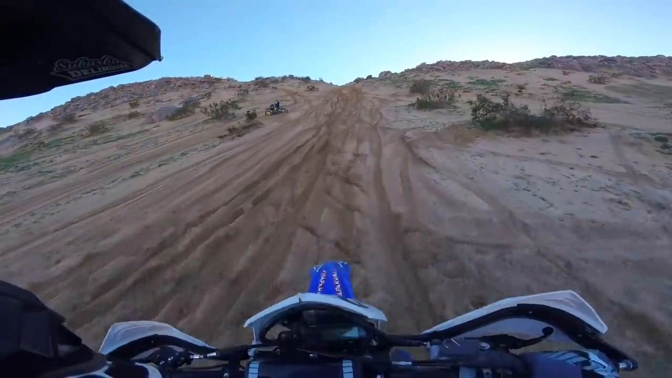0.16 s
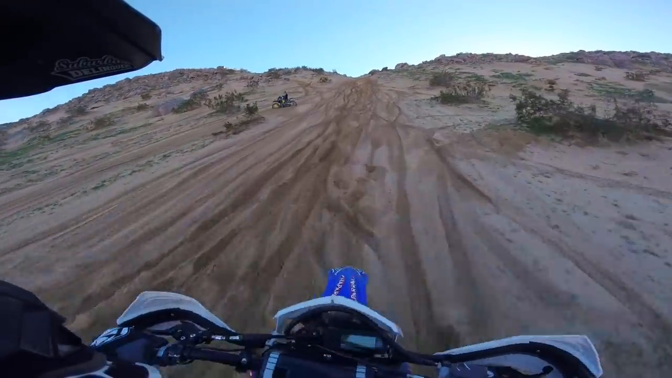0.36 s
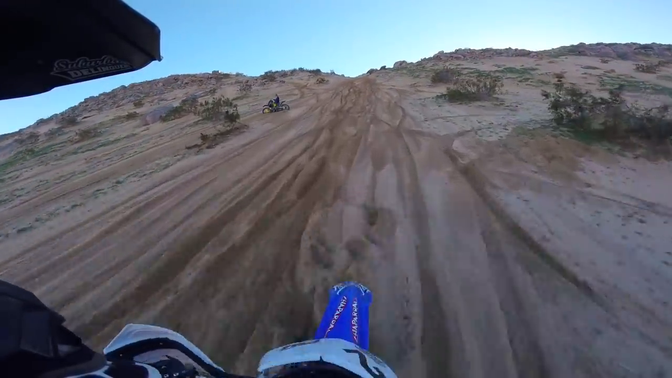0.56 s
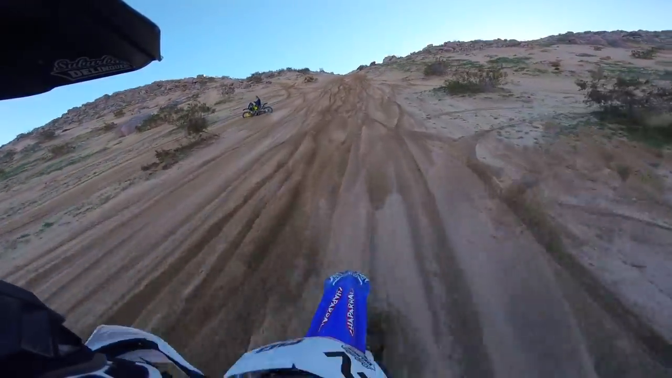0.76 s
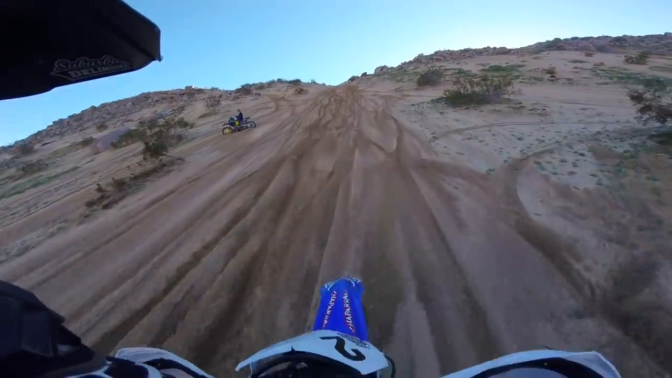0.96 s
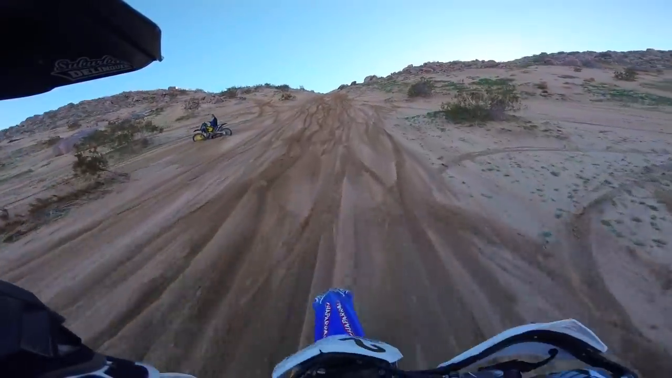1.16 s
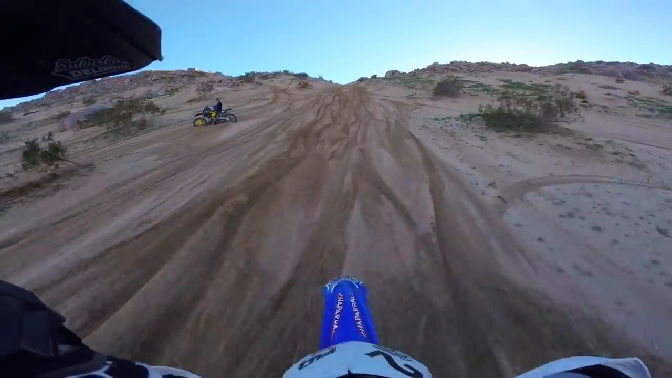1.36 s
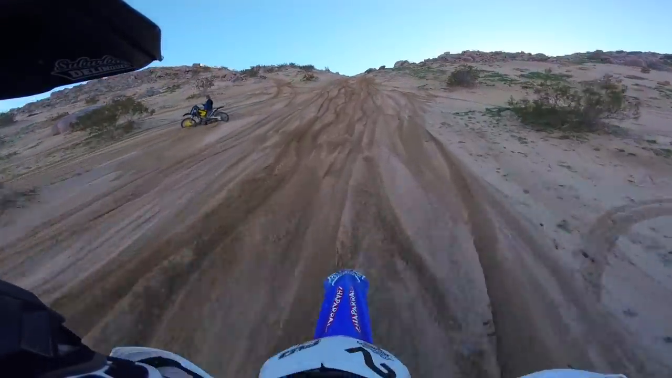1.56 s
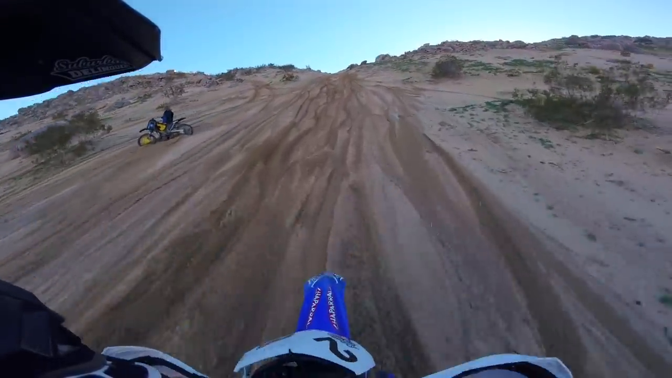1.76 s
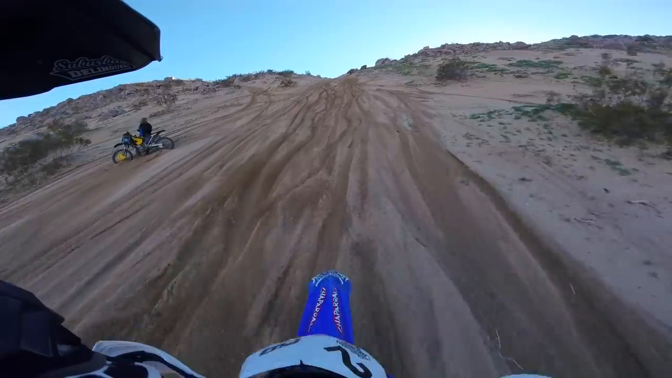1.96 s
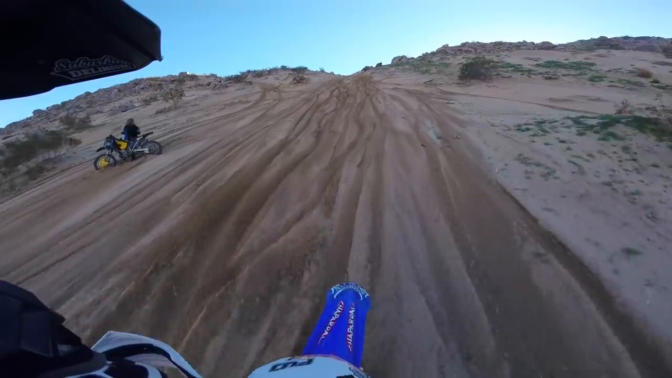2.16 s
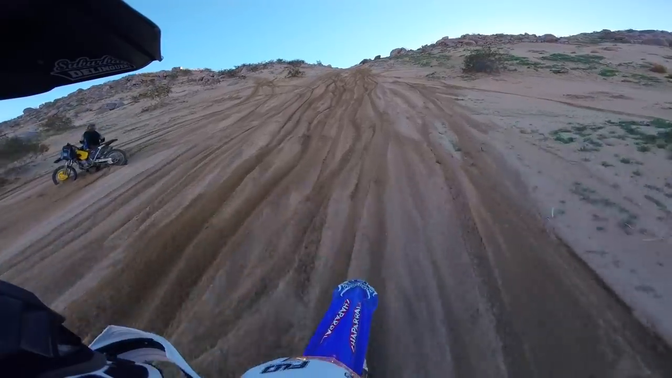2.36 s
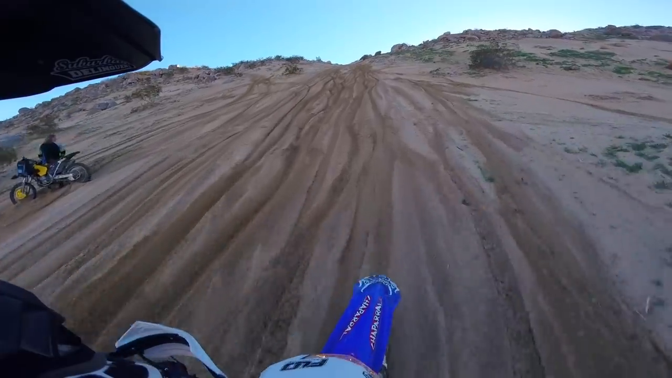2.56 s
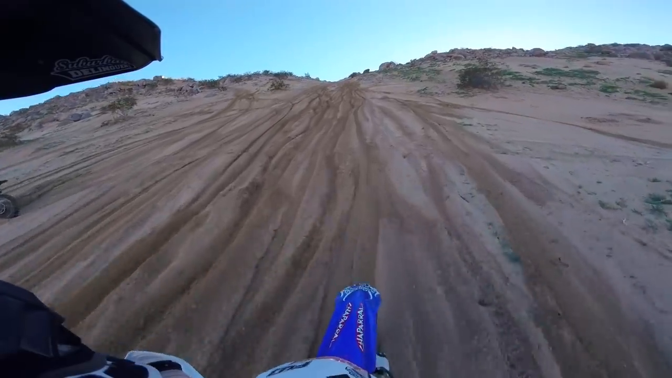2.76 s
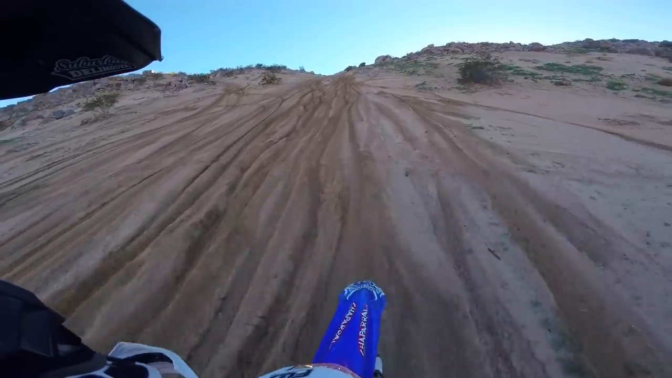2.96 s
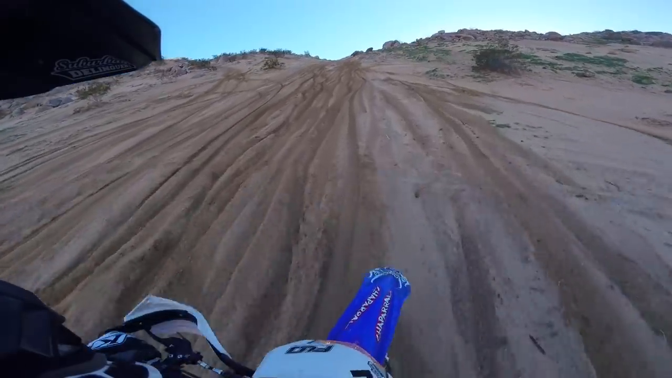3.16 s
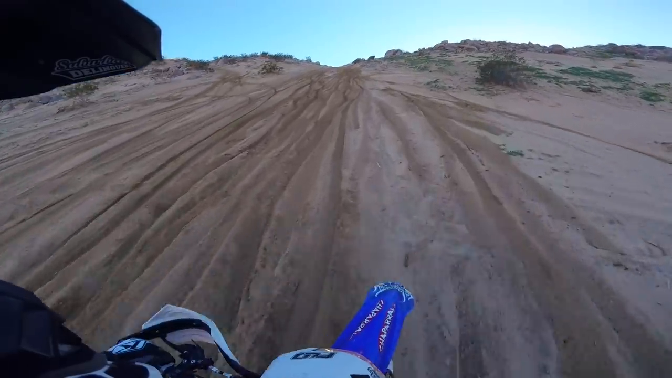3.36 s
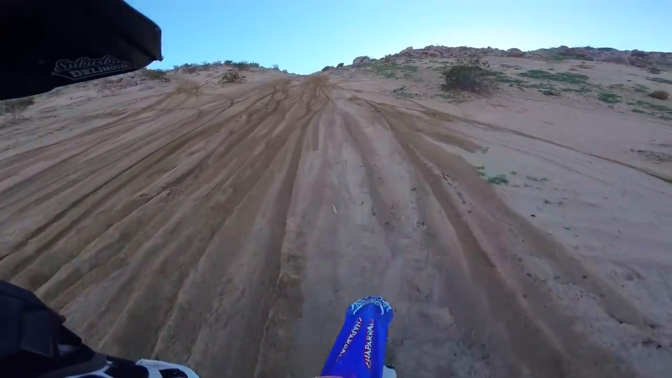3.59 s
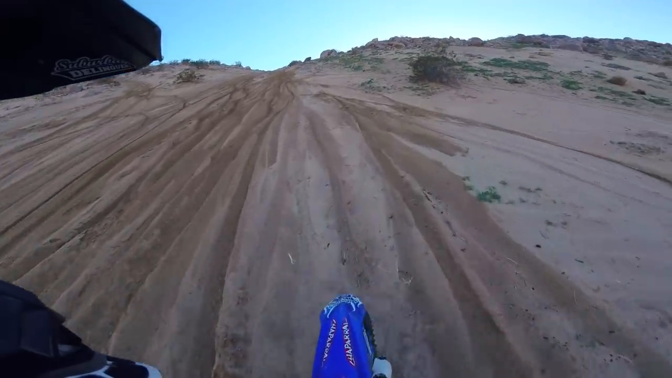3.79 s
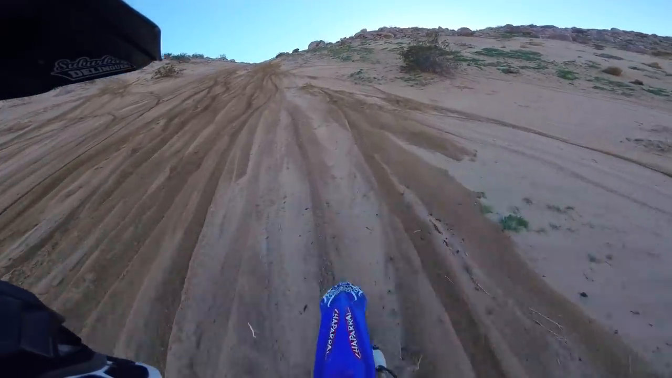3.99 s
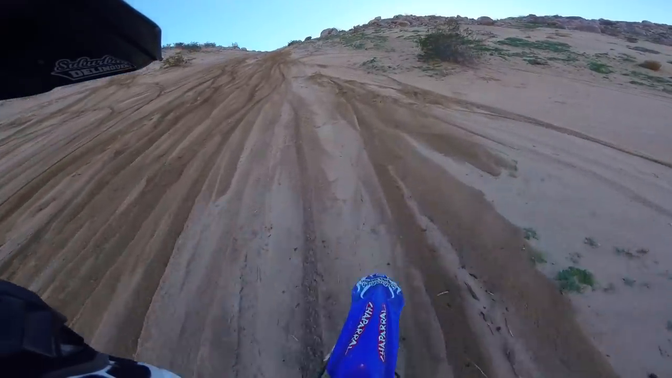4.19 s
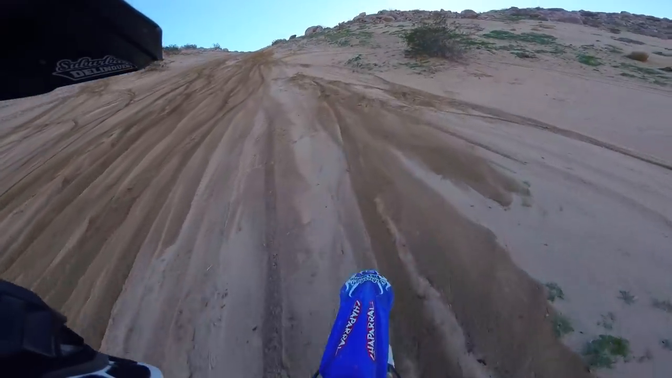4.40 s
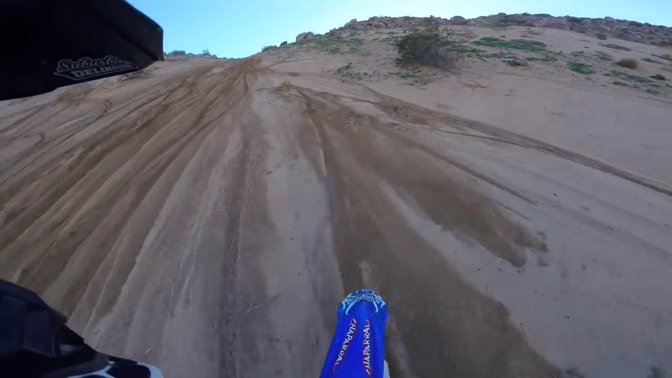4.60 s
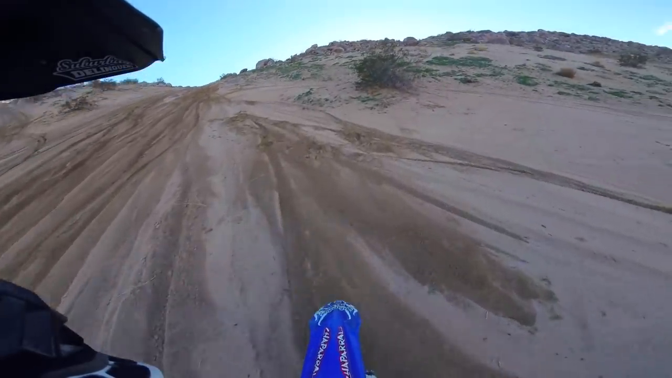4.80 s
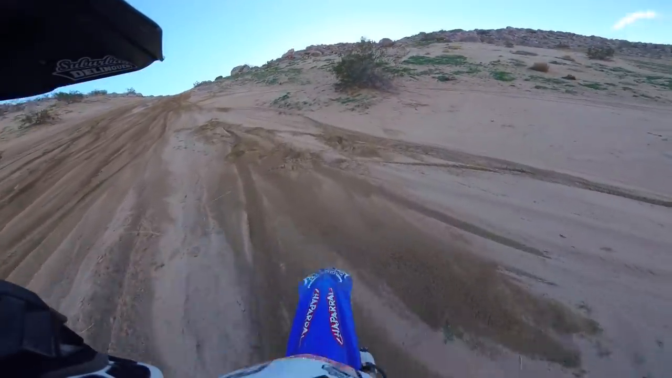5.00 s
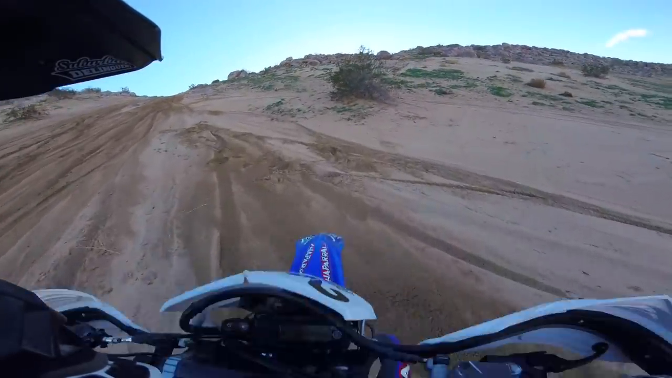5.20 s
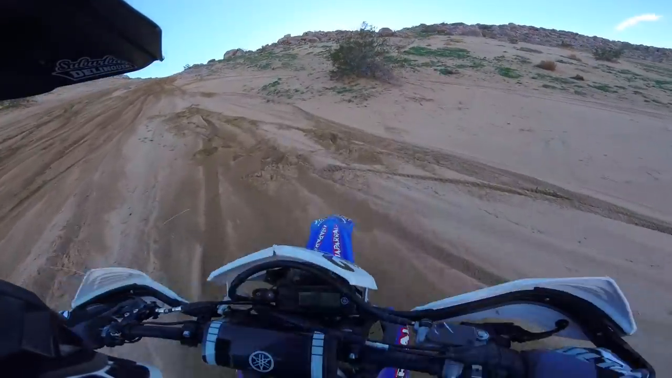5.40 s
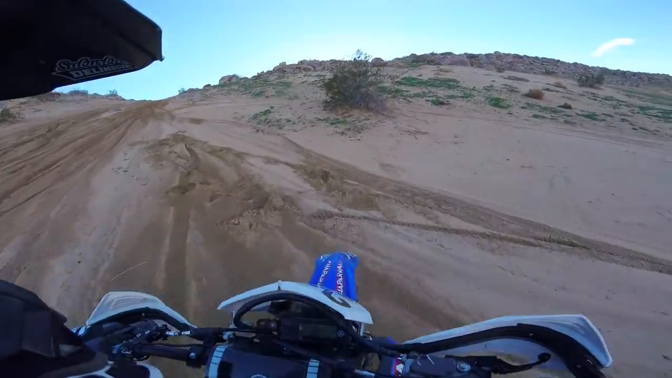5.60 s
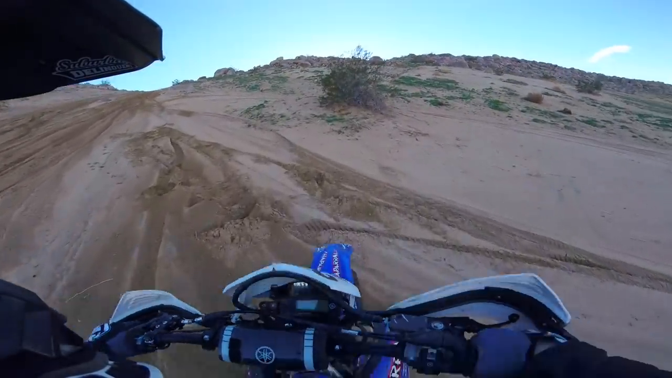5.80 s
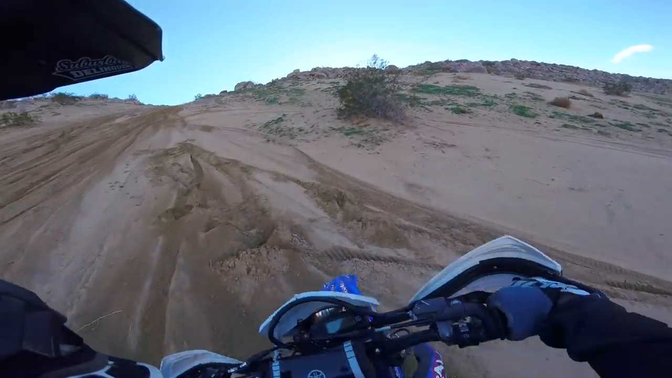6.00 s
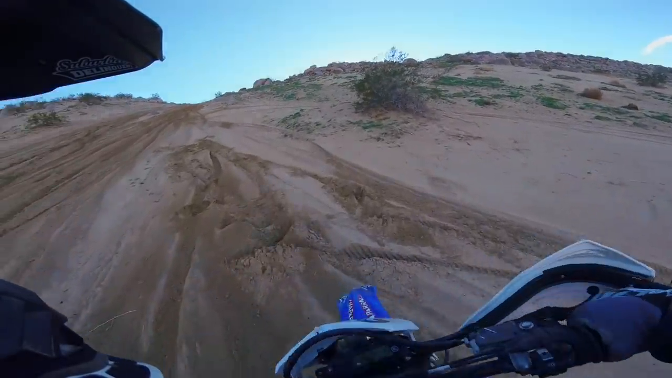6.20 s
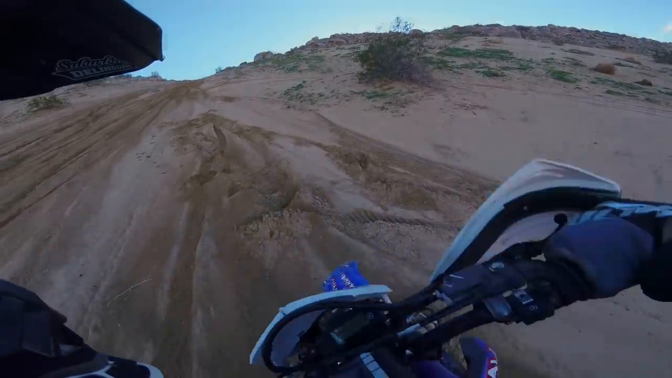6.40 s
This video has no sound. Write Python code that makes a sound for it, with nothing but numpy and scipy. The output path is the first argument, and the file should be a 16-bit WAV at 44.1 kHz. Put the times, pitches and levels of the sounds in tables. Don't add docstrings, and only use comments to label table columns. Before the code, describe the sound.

From the rider's helmet, a single-cylinder four-stroke dirt bike blares at full throttle up a sand hill. Revs rise briefly, settle into a rough steady drone with valve clatter and intake boom, then sag and drop as the throttle closes, leaving low soft puffs and small fading pops. Low wind buffeting and faint sand spray outdoors.

```python
import sys
import numpy as np
from scipy import signal
from scipy.io import wavfile

SR = 44100
rng = np.random.default_rng(int(sys.argv[2]) if len(sys.argv) > 2 else 0)


def attenuation_scalar(level_db):
    decades = np.asarray(level_db, float) / 20
    return 10 ** decades


def pcm_store(signal):
    levels = np.round(np.clip(np.atleast_2d(signal), -1, 1) * 32767)
    wavfile.write(sys.argv[1], SR, levels.astype(np.int16).T)


N = 284445
T = np.arange(N) / SR
CRUISE_HZ = 79.9

# [t/s, air and chassis noise level/dB]
SPEED = [(0, -1), (1.2, -2), (2.7, -6), (4.4, -6.5), (5.6, -12), (6.45, -12)]
# [t/s, length/s, rise/dB]
SURGES = [(.2, 0.05, 1), (.8, 0.063, 1), (2.2, .07, 1), (5.0, 0.024, 2), (5.65, 0.064, 4)]
# [t/s, intake path lead/ms, ground echo lag/ms, echo level/dB]
HEAD = [(0, 0.72, 3.46, -21), (.5, .82, 3.04, -12), (1, 0.65, 3.18, -10), (2, 0.8, 3.06, -13.5),
        (3, 0.97, 2.96, -13.5), (4.2, .8, 2.94, -20), (4.8, 1, 2.95, -9), (5.3, .86, 3.2, -7),
        (5.72, 0.68, 3.27, -7), (5.95, .8, 9.3, -7)]
# [f/Hz, signed strength, t60/s]
CRACK = [(1042, 0.33, 0.22), (1224, -1.82, 0.047), (1424, 0.32, 0.046), (1769, -0.8, .03),
         (1811, 0.96, 0.045), (2058, -0.19, 0.0084), (2500, 0.16, 0.017), (2920, -.12, 0.007),
         (3803, 0.2, 0.0057), (4900, 0.23, 0.004)]


def in_time(rows):
    s, *columns = np.transpose(rows)
    return [np.interp(T, s, c) for c in columns]


def at(curve, s):
    return np.interp(s, T, curve)


def delayed(x, lag_ms):
    return np.interp(T - lag_ms / 1000, T, x, left=0)


def filtered(x, order, hz, kind="low"):
    return signal.sosfilt(signal.butter(order, hz, kind, fs=SR, output="sos"), x)


def rms_one(x):
    return x / np.sqrt(np.mean(x ** 2) + 1e-20)


def drift(rate):
    r = np.exp(-80 * np.pi * rate / SR)
    slow = signal.lfilter([1], [1, -2 * r, r * r], rng.standard_normal(N // 40 + 2002))[2000:]
    return np.interp(np.arange(N) / 40, np.arange(len(slow)), rms_one(slow))


def swells(rows):
    return sum(height * np.exp(-.5 * ((T - s) / length) ** 2) for s, length, height in rows)


def clicks(at_s, size):
    place = np.clip(at_s * SR, 0, N - 2)
    whole, out = place.astype(int), np.full(N, 1e-18)
    np.add.at(out, whole, size * (1 - place + whole))
    np.add.at(out, whole + 1, size * (place - whole))
    return out


def body(at_s, size, modes, uneven_db, wander_db):
    out = np.zeros(N)
    where = np.clip(at_s * SR, 0, N - 1).astype(int)
    for hz, strength, t60 in modes:
        r, w = attenuation_scalar(-60 / (t60 * SR)), 2 * np.pi * hz / SR
        scatter_db = uneven_db * rng.standard_normal(2500)[:len(at_s)]
        own = attenuation_scalar(scatter_db + wander_db * drift(1.0)[where])
        struck = clicks(at_s, size * own)
        out += signal.lfilter([0, strength * np.sin(w)], [1, -2 * r * np.cos(w), r * r], struck)
    return out


def coloured(spectrum, patchy_db):
    hz, level_db = np.transpose(spectrum)
    edges = hz[0] * 2 ** np.arange(0, np.log2(hz[-1] / hz[0]), 1 / 3)
    white, out = rng.standard_normal((2, N)), 0
    for k, (low, high) in enumerate(zip(edges, edges[1:])):
        band = filtered(white[k % 2], 2, [low, high], "band")
        band_db = np.interp(np.log(low * high) / 2, np.log(hz), level_db)
        out = out + band * attenuation_scalar(band_db + patchy_db * drift(6))
    return rms_one(out)


def engine():
    # [t/s, opening/0-1]
    throttle = [
        (0, 0.68),
        (5.73, 0.67),
        (5.8, 0),
        (6.45, 0),
    ]
    # [t/s, exhaust/dB, intake/dB, valve flutter/dB]
    posture = [(0, 0, 1.5, 4), (.27, 0.5, 2, 3), (.52, -5, 2, -7), (.75, -1, -1.5, 6), (1.1, 0.5, 2, -2),
               (2.1, -1.5, 1.5, 13), (2.9, 0.5, 1.5, -11), (3.6, 1, 1.5, 2), (4.47, 0, 1.5, 11),
               (4.95, -2, 1.5, -2), (5.23, -1.5, 3.5, -7.5), (5.7, -2, -0.5, -4)]
    # [silencer pop/dB, pipe ring/dB]
    burns = [
        (-12, 2),
        (-1.5, 1),
        (-4.5, -1.5),
    ]
    timed_firing_s = 5.9425
    intake_turn = 0.4898
    rate, opening = revs(), np.clip(in_time(throttle)[0], 0, 1)
    shut = np.clip(1 - 4 * opening, 0, 1)
    exhaust_db, intake_db, flutter_db = in_time(posture)

    turns = np.cumsum(rate) / SR
    turns = turns - at(turns, timed_firing_s)
    angle = turns % 1
    cycles = np.arange(np.floor(turns[0]), turns[-1])
    fired = np.interp(cycles, turns, T) + 1.5e-5 * rng.standard_normal(600)[:len(cycles)]
    gulped = np.interp(cycles + intake_turn, turns, T)
    gulped -= at(in_time(HEAD)[0], gulped) / 1000
    pop_db, ring_db = np.array(burns)[cycles.astype(int) % len(burns)].T

    air = exhaust(fired, opening * attenuation_scalar(exhaust_db))
    air += intake(gulped, opening * attenuation_scalar(intake_db) * (rate / 80) ** 1.6)
    air += valve_crack(fired, gulped, opening, rate, shut)
    air += silencer_pops(fired, pop_db)
    air = around_the_helmet(air)
    air += valve_flutter(angle, opening, flutter_db)
    air += clatter(angle, shut)
    puffs = overrun(1 - opening, rate, angle, fired, exhaust_db, ring_db)
    return air, puffs + frame_shake(rate, angle, shut)


def revs():
    # [t/s, firing rate f/Hz]
    load = [(0, 75.1), (.1, 77), (.33, 85.8), (.5, 88.15), (.7, 89.47), (.93, 82.57), (1.2, 81.17),
            (2.25, 80.6), (2.62, 78.38), (4.1, 78.08), (4.4, 77.65), (4.62, 75.38), (4.8, 71.35),
            (5.1, 70.69), (5.43, 69.55), (5.6, 65.17), (5.75, 57.95), (5.83, 50.05)]
    # [t/s, length/s, change f/Hz]
    slips = [(1.35, .07, -1), (1.68, .1, .8), (1.91, .025, .9), (2.07, .05, -.4), (2.95, .09, 1),
             (3.13, .03, -.6), (3.53, .11, -1.7), (4.06, .07, .4), (4.81, .02, -.6), (4.9, .04, 1.3),
             (5.04, .04, .9), (5.18, .05, -.7)]
    idle_hz, sink_s = 22, .53
    shut_s, shut_hz = load[-1]
    since = np.maximum(T - shut_s, 0)
    return in_time(load)[0] + swells(slips) - (shut_hz - idle_hz) * (1 - np.exp(-since / sink_s))


def exhaust(fired, strength):
    # [f/Hz, signed strength, t60/s]
    pipe = [(391.5, -3.5, 0.0066), (300.1, 1.04, 0.028), (391.3, 1.79, 0.024), (514.5, 0.5731, 0.034),
            (646.6, 1.05, 0.0081), (799, 0.3472, 0.044), (1100, -0.0834, 0.0018)]
    return body(fired, at(strength, fired), pipe, uneven_db=.15, wander_db=.6)


def intake(gulped, strength):
    # [f/Hz, signed strength, t60/s]
    airbox = [(167, -0.5, 0.058), (234.3, -0.31, 0.045), (362, 0.16, 0.06), (638.7, 0.37, 0.018),
              (814, -0.023, 0.075), (1006, -0.000025, 0.012)]
    return body(gulped, at(strength, gulped), airbox, uneven_db=.27, wander_db=1.2)


def valve_crack(fired, gulped, opening, rate, shut):
    bounces = [(1.7, -0.67), (3.4, 0.48), (5.3, 0.53)]
    crack = body(fired - .0006, at(.05 + .95 * opening, fired), CRACK, uneven_db=1.8, wander_db=2.6)
    crack += .7 * body(gulped, at(opening, gulped), CRACK, uneven_db=1.8, wander_db=2.6)
    crack += sum(share * delayed(crack, lag_ms) for lag_ms, share in bounces)
    level_db = -27.5 + .5 * (rate - CRUISE_HZ) + swells(SURGES) - 14 * shut
    return attenuation_scalar(level_db) * rms_one(crack)


def silencer_pops(fired, pop_db):
    # [f/Hz, signed strength, t60/s]
    silencer = [(1580, 1.2, 0.0089), (1730, -1.6, 0.012), (1980, 1.1, 0.01)]
    from_s, lag_s, fade_db_per_s = 5.87, 0.00195, 20
    size = (fired > from_s) * attenuation_scalar(-26.5 + pop_db - fade_db_per_s * (fired - from_s))
    return filtered(body(fired + lag_s, size, silencer, uneven_db=2, wander_db=0), 4, 2400)


def around_the_helmet(air):
    _, echo_ms, echo_db = in_time(HEAD)
    air = filtered(air, 3, 5500)
    air -= 0.9 * filtered(air, 1, [870, 990], "band")
    return air + attenuation_scalar(echo_db) * delayed(air, echo_ms)


def valve_flutter(angle, opening, flutter_db):
    swing = np.sin(2 * np.pi * 10.2 * angle) * np.sin(np.pi * angle) * np.exp(-angle / 0.42)
    return opening * attenuation_scalar(flutter_db - 25.5) * swing


def clatter(angle, shut):
    # [f/Hz, level per Hz/dB]
    roar_and_gear = [(110, 2), (300, 0), (1000, -4), (1300, -9), (2000, -15), (2600, -16),
                     (3200, -17), (3900, -18.5), (5000, -22), (6800, -32.5), (8000, -32.5), (9000, -29.5),
                  (10200, -39.5), (13200, -48.5), (15500, -56)]
    # [f/Hz, signed strength, t60/s]
    chassis = [(3750, 1.8, 0.019), (4210, 3, 0.023), (4750, 3.4, .03), (5350, 0.91, 0.024),
               (8850, 0.74, 0.015), (9400, 0.72, 0.017), (10400, 0.17, 0.025), (11800, .2, .03),
               (13500, .2, 0.018)]
    change_db = 0.92 * in_time(SPEED)[0] + swells(SURGES) - 3 * shut
    gate = 1 + 0.017 * np.cos(2 * np.pi * angle) + 0.022 * np.cos(4 * np.pi * angle)
    noise = gate * coloured(roar_and_gear, patchy_db=1.1)
    knocked = rng.uniform(0, N / SR, 2500)
    knocks = body(knocked, at(attenuation_scalar(-63 + change_db), knocked), chassis, uneven_db=5, wander_db=4)
    return attenuation_scalar(-27.5 + change_db) * noise + knocks


def overrun(closed, rate, angle, fired, level_db, ring_db):
    # [f/Hz, signed strength, t60/s]
    pipe_shut = [(204, -0.17, 0.017), (303, 0.37, 0.023), (388, 0.083, 0.032), (457, 0.07, 0.048),
                 (740, 0.059, 0.072)]
    burn = np.searchsorted(fired * SR, np.arange(N))
    uneven = attenuation_scalar(.8 * rng.standard_normal(600))[burn]
    swings = 4.5 * (rate / 48) ** 1.1
    puff = -np.sin(2 * np.pi * swings * angle) * angle / 0.055 * np.exp(-angle / 0.064) * np.sqrt(1 - angle)
    puff = filtered(closed * uneven * attenuation_scalar(level_db - 2.0) * puff, 2, [60, 600], "band")

    where = np.clip(fired * SR, 0, N - 1).astype(int)
    size = (closed * rate / 48)[where] * attenuation_scalar(ring_db - 1.0)
    rings = body(fired - .002, size, pipe_shut, uneven_db=.9, wander_db=0)
    rings += 0.32 * np.interp(np.arange(N) - .45 * SR / rate, np.arange(N), rings)
    rings = filtered(rings, 3, 600)

    breath = (0.56 + np.exp(-angle / 0.58)) * rng.standard_normal(N)
    breath = filtered(breath, 2, [90, 600], "band")
    return puff + rings + closed * attenuation_scalar(-33.5) * rms_one(breath)


def frame_shake(rate, angle, shut):
    # [t/s, length/s, rise/dB]
    jolts = [
        (.2, .15, 5),
        (.85, .12, 4),
        (3.7, .2, 2.5),
        (4.7, 0.28, 5),
    ]
    lug_hz, rock_turn = 22, 0.043
    lugging = np.clip((CRUISE_HZ - rate) / lug_hz, 0, 1)
    rock = lugging * attenuation_scalar(-31) * np.sin(4 * np.pi * (angle - rock_turn))
    shake_db = -30 - 3.5 * shut + swells(jolts)
    shake = attenuation_scalar(shake_db) * np.clip(rate / 55, 0, 1) ** 3 * np.sin(2 * np.pi * angle)
    return np.sqrt(2) * (rock + shake)


def wind():
    # [t/s, length/s, rise/dB]
    gusts = [(.14, 0.06, 7), (.86, .03, 7), (2.19, 0.06, 6), (2.71, 0.025, 10), (4.89, 0.047, 7),
             (5.75, 0.02, 10), (6.0, .1, 5), (6.45, 0.055, 15.5)]
    low = filtered(rng.standard_normal(N), 2, [22, 90], "band")
    level_db = -28 + 1.46 * in_time(SPEED)[0] + swells(gusts) + 0.64 * drift(0.7)
    return attenuation_scalar(level_db) * rms_one(low)


def spray():
    # [t/s, length/s, level/dB]
    throws = [
        (2.214, .055, -58),
        (.14, .03, -62),
        (.8, .1, -62),
    ]
    hiss = filtered(rng.standard_normal(N), 3, [7000, 12000], "band")
    return swells([(s, length, attenuation_scalar(level_db)) for s, length, level_db in throws]) * rms_one(hiss)


def scene():
    airborne, shake = engine()
    thinned = filtered(airborne, 2, 132, "high")
    return (thinned + shake + wind() + spray())[None]


def low_pass(x):
    return signal.sosfilt(signal.butter(12, 14990, fs=SR, output="sos"), x)


def record(dry):
    return low_pass(np.tanh(dry + dry ** 3 / 3))


dry = scene()
out = record(dry)
pcm_store(out)
```